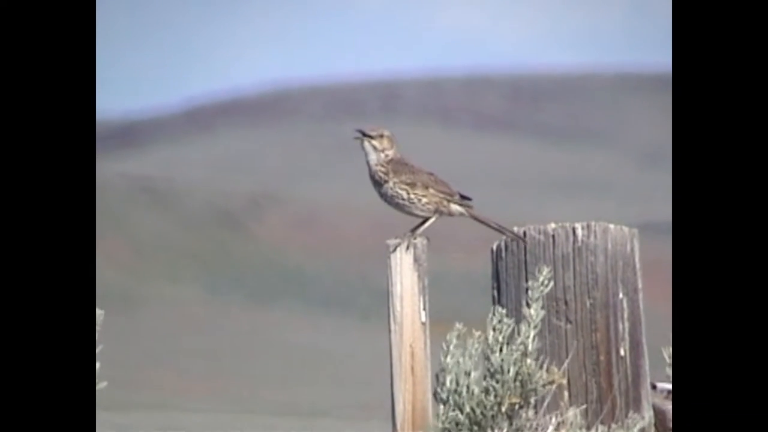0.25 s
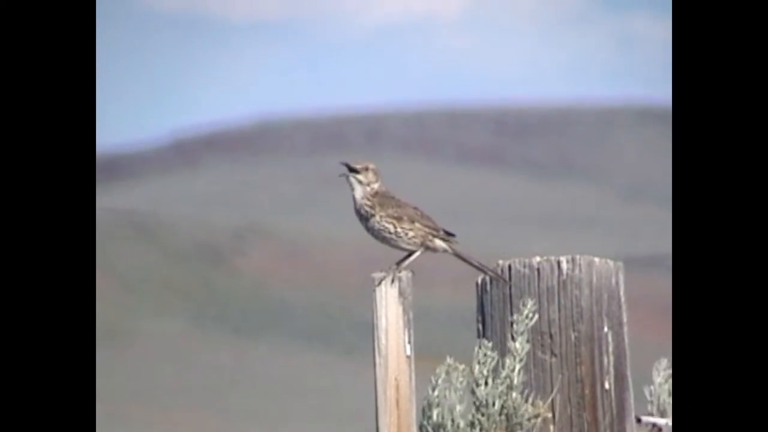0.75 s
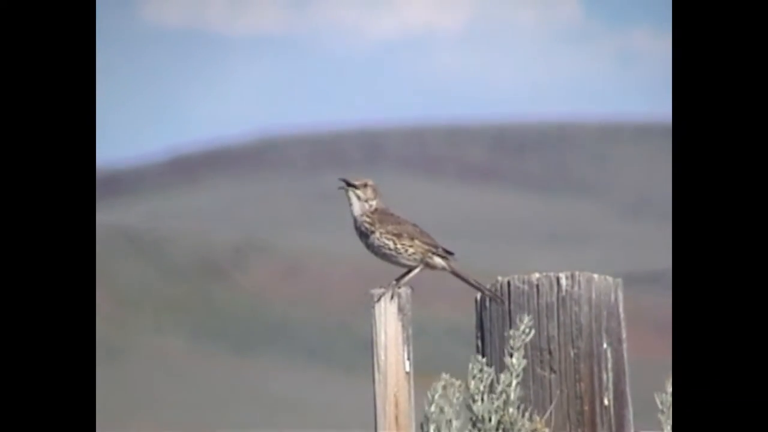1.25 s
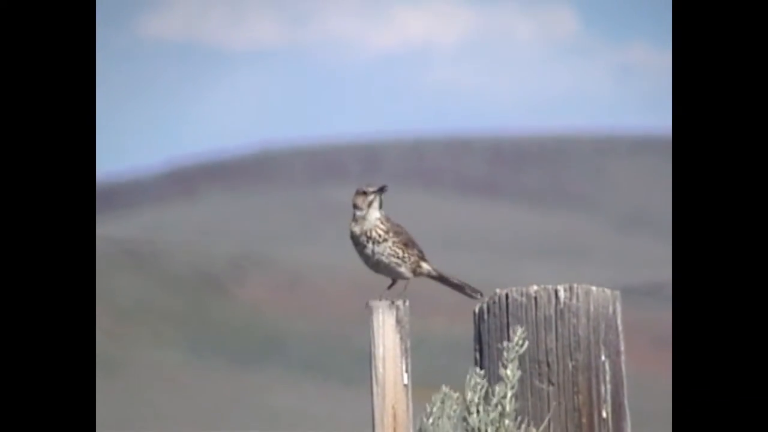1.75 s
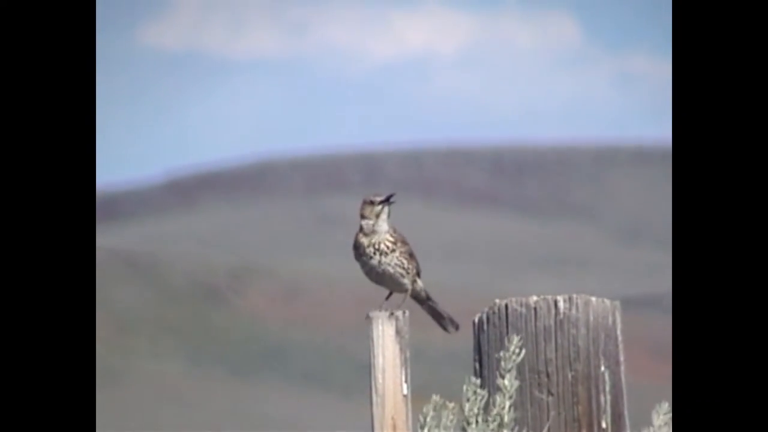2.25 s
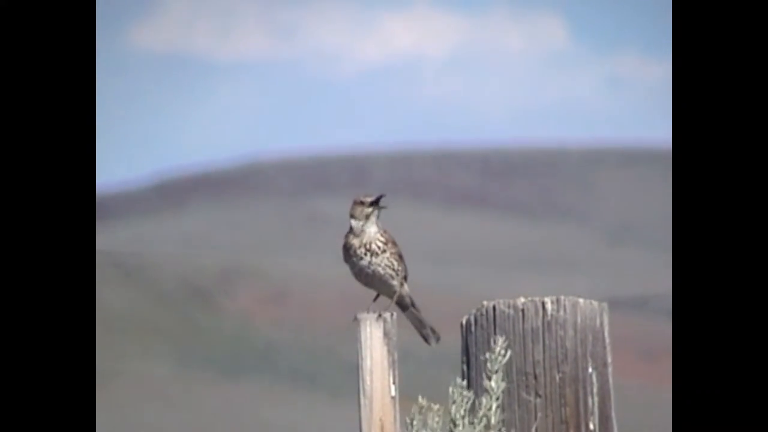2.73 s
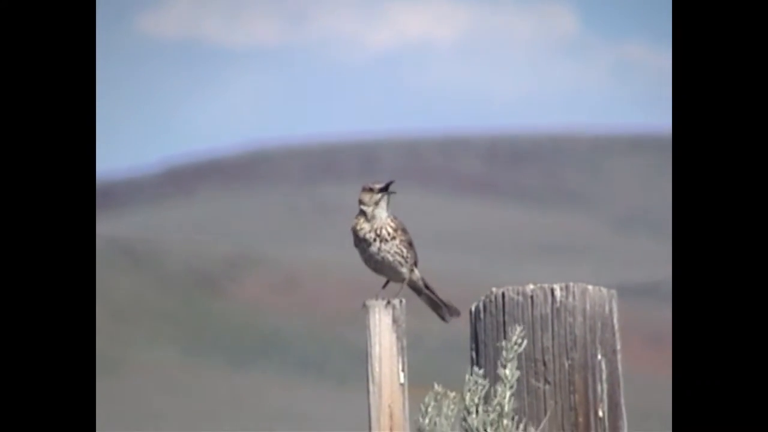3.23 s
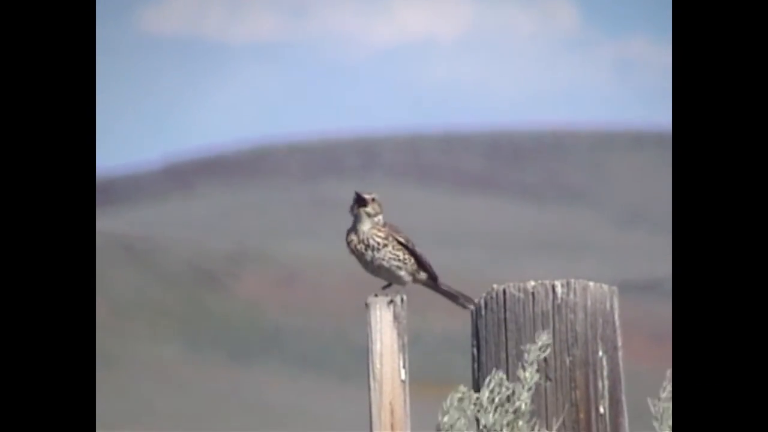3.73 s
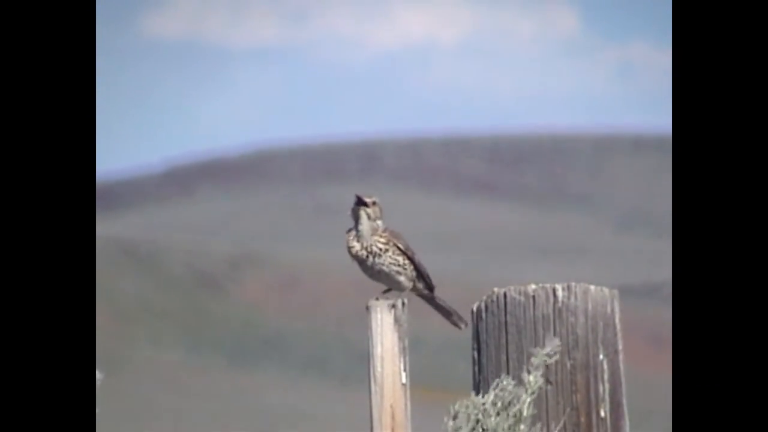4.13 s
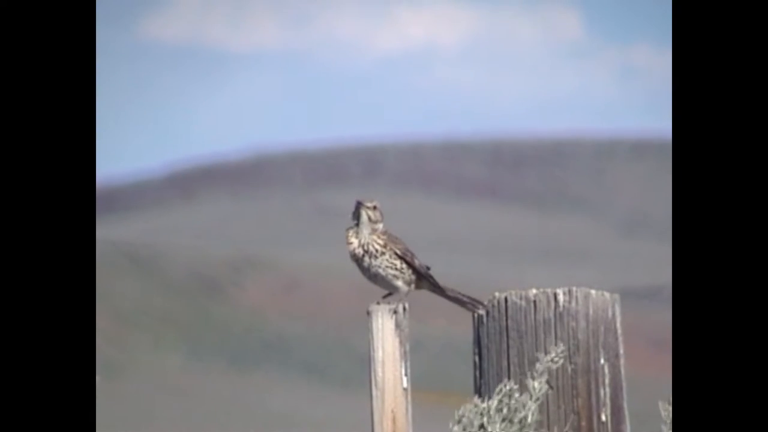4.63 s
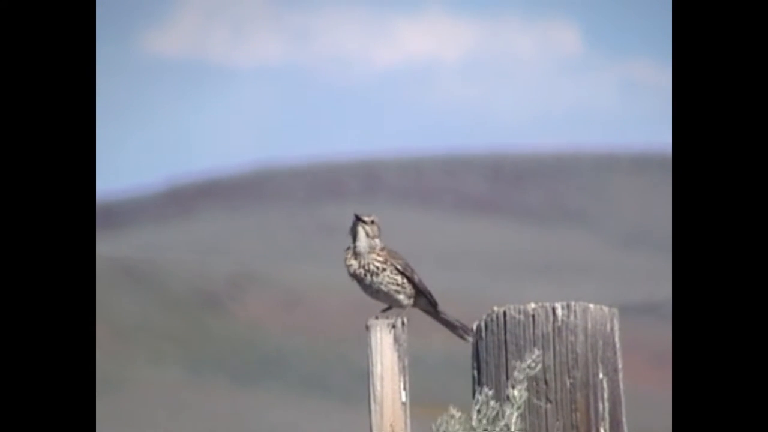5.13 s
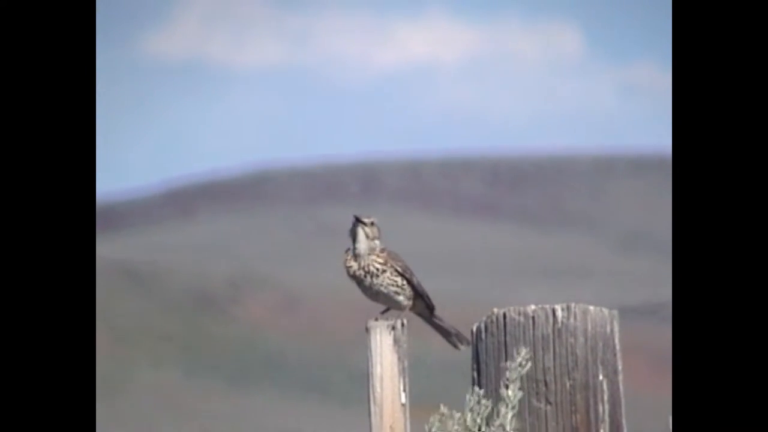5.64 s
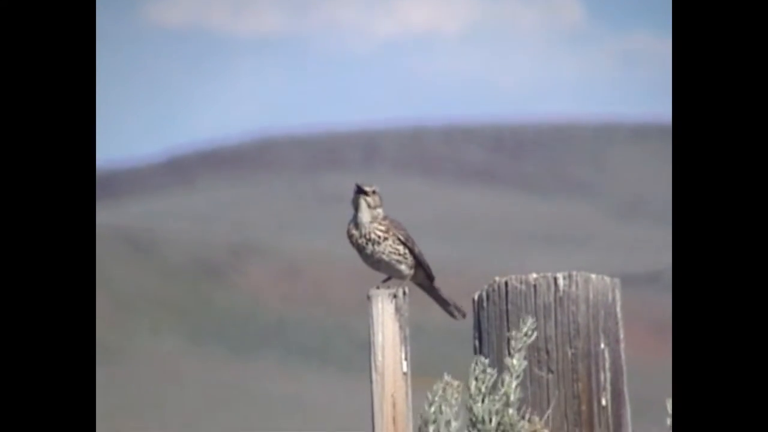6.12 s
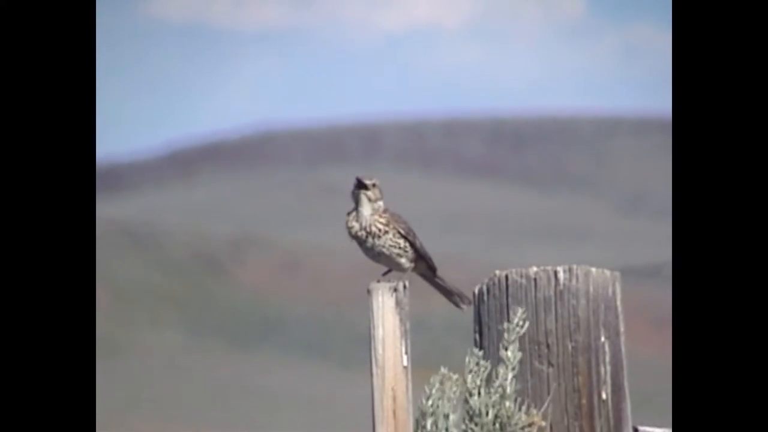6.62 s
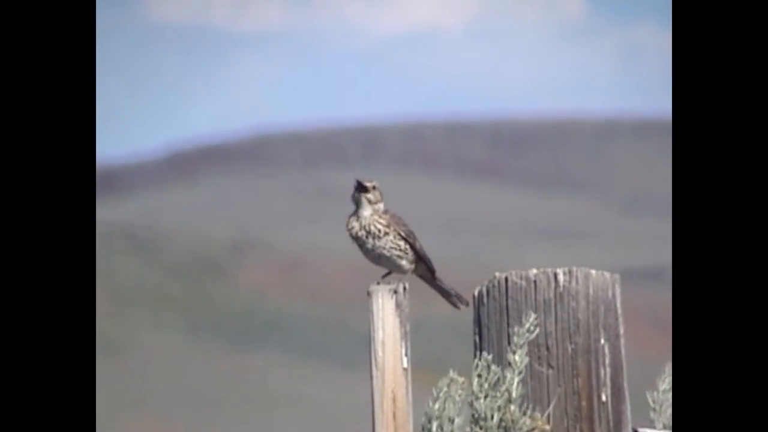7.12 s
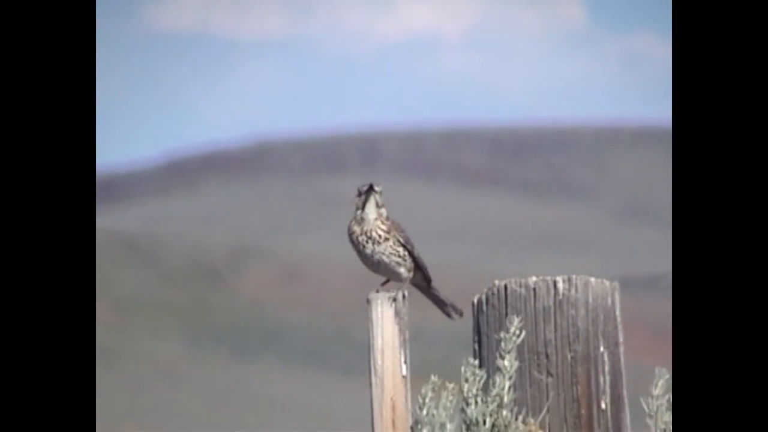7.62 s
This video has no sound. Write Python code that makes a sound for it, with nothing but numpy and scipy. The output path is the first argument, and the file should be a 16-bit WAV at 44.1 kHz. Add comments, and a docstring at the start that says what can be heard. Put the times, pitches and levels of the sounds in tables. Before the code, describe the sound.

A single songbird close by in open scrubland sings almost without pause: faint whistles and buzzes first, then louder sweeps, high shivering trills and reedy rattles, ending in scratches and ticks. Wind puffs lightly on the microphone, thumps hard just before four seconds, then buffets heavily, briefly overloading. One sharp click falls near 4.75 seconds. A faint hiss runs throughout, with barely any echo.

```python
"""A thrush-like songbird on a fence post warbles: whistles and buzzes first, then sweeps, trills and reedy notes.
The two sides of its syrinx sing as gliding tones, and low reeds sweep their overtones through a throat resonance.
The open scrub returns a faint short echo; an even hiss of air and electronics lasts throughout.
Weak gusts of shaped noise open the scene, the first very strong one comes at 3.9 s, a lone click at 4.75 s.
Stronger gusts and breeze follow, the hardest pushed into clipping, and the song ends in scratches and ticks."""
import sys
import numpy as np
from scipy import signal
from scipy.fft import rfft, irfft
from scipy.io import wavfile
from scipy.ndimage import uniform_filter1d

SR = 44100
rng = np.random.default_rng(int(sys.argv[2]) if len(sys.argv) > 2 else 0)


def generate_wav(sig):
    """Save sig (samples, or channels by samples) to the path in sys.argv[1] as 16-bit PCM at SR."""
    pcm = np.round(np.clip(np.atleast_2d(sig).T, -1, 1) * 32767).astype(np.int16)
    wavfile.write(sys.argv[1], SR, pcm)


N = 347067


def undb(db):
    """Level law: 20 dB is a tenfold amplitude."""
    return 10 ** (np.asarray(db) / 20)


def gain_at(hz, points):
    """Frequency response: gain of a (frequency_hz, level_db) curve, interpolated over log frequency."""
    f, db = np.transpose(points)
    return undb(np.interp(np.log(hz + 0.0006), np.log(f), db))


def noise(gain):
    """Spectral shaping: white noise weighted by gain(hz) and brought to rms 1."""
    spectrum = rfft(rng.standard_normal(N)) * gain(np.fft.rfftfreq(N, 1 / SR))
    x = irfft(spectrum, N)
    return x / x.std()


def walk(rate):
    """Slow random modulation: levels held 1 / rate s, smoothed twice, with a standard deviation of 1."""
    hold = max(2, int(SR / rate))
    steps = np.repeat(rng.standard_normal(N // hold + 1), hold)
    x = uniform_filter1d(uniform_filter1d(steps, hold), hold)[:N]
    return x / x.std()


def sung(voice):
    """Motor programme: song notes of one voice, each syllable at its own time, strength, pitch and pace."""
    # Repertoire: syllable name -> gestures of one voice each. "lead" and "second" are the two sides of the
    # syrinx, "reed" is a low note rich in overtones. Warbled gestures add a trill, reeds a throat resonance:
    # voice, start_s, length_s, first_hz, middle_hz, last_hz, level_db (relative),
    # trill_rate_hz, trill_depth_octaves, throat_hz; start, length, pitch and rate before the song's ratios
    syllables = { "whistle": [("lead", 0, .13, 1925, 1883, 1850, 0)],
                 "flick": [("lead", 0, .01, 3550, 3050, 2550, 0)],
                 "tick": [("lead", 0, .004, 2730, 3600, 4400, 0)],
                 "chip": [("second", 0, .004, 3900, 3100, 2200, -10),
                 ("lead", 0, .02, 2300, 2530, 2950, 0)],
                 "buzz": [("lead", .001, .028, 2200, 2330, 2230, 1.5, 155, -0.083),
                 ("lead", .027, .024, 2380, 2480, 2580, -6, 152, -0.154),
                 ("reed", .002, .044, 2200, 2300, 2330, -30, 155, -0.11, 3960)],
                 "twitter": [("lead", 0, .033, 2450, 2155, 2130, 0, 63, -0.1)],
                 "thin trill": [("lead", 0, 0.047, 4680, 4900, 4900, 0, 49, 0.035)],
                 "waver": [("lead", 0, .071, 2640, 2446, 2480, 0),
                 ("lead", .061, .132, 2440, 2303, 2394, -3, 30, 0.036)],
                 "tumble": [("lead", 0, 0.01425, 3600, 3700, 3670, -3.5),
                 ("lead", .016, .019, 4500, 2890, 2890, 0),
                 ("lead", .033, .037, 2530, 3135, 2950, 0, 45, -0.086)],
                 "duet": [("lead", 0, .028, 1880, 2110, 2080, 0),
                 ("second", .015, 0.042, 1720, 1700, 1820, -2.35)],
                 "sigh": [("lead", 0, .028, 1735, 1850, 1960, 0),
                 ("second", 0.026, .016, 1290, 1194, 1230, -6)],
                 "zip": [("reed", 0, 0.0205, 1500, 1964, 2680, 0, 112, 0.16, 3600),
                 ("lead", .016, .034, 2300, 3480, 3930, 0, 121, -0.066)],
                 "settle": [("lead", 0, 0.046, 2620, 2430, 2100, -7, 52, 0.065),
                 ("lead", 0.0341, .032, 2260, 2170, 2200, 0.89), ("lead", .056, .07, 2166, 2158, 2168, 0)],
                 "burr": [("lead", 0, .029, 2300, 2344, 2100, -6, 150, 0.212),
                 ("lead", .028, .015, 1970, 2444, 1894, 0),
                 ("reed", .008, .035, 1700, 2340, 2800, -26, 150, 0.21, 4200),
                 ("reed", 0.036, 0.019, 2700, 1800, 1403, -7.5, 0, 0, 2260)],
                 "hiccup": [("lead", 0, .016, 4530, 3350, 5090, 0),
                 ("lead", 0.011, .044, 4850, 5040, 4750, -7)],
                 "step": [("lead", 0, 0.0341, 2380, 2240, 2124, -9.5, 98.8, 0.1),
                 ("lead", .03, .04, 2210, 2112, 2215, 0), ("lead", .069, .036, 2055, 1956, 1910, -5)],
                 "slur": [("lead", 0, .02, 2700, 2810, 3300, -7.5),
                 ("lead", .026, 0.028, 2510, 2820, 2880, 0), ("lead", .05, 0.085, 2770, 2374, 2040, -1.2)],
                 "two-note": [("lead", 0, .036, 2130, 2313, 1990, 0),
                 ("lead", .048, .02, 2160, 2086, 1780, -1.7)],
                 "swoop": [("lead", 0, .014, 6200, 5130, 4300, -20.5),
                 ("lead", .014, .022, 4300, 3350, 3020, 0), ("lead", .074, .036, 3100, 3440, 3620, 1),
                 ("lead", .1, .066, 3540, 3890, 4060, -2.4)],
                 "whine": [("second", 0, 0.0497, 1905, 1800, 1650, 0.5),
                 ("second", .045, .06, 1620, 1450, 1270, -12.5, 44, .06),
                 ("reed", .018, .1, 1759, 1450, 1220, 0, 44, .08, 2220)],
                 "arch": [("lead", 0, .016, 2900, 3900, 4400, -2.5),
                 ("lead", .013, .021, 4800, 4800, 4050, 0)],
                 "shiver": [("lead", 0, 0.0481, 4020, 3960, 3980, 0, 70.5, 0.0672),
                 ("lead", .043, .034, 3980, 4010, 4080, -5.5, 70.5, 0.055),
                 ("lead", .097, .016, 4620, 4280, 3700, -4.5)],
                 "hook": [("lead", 0, 0.027, 2180, 2520, 2200, -4),
                 ("lead", 0.024, 0.06, 2260, 2240, 2290, 0)],
                 "peak": [("lead", 0, .024, 2700, 2520, 3240, -4),
                 ("lead", .0225, .018, 3460, 2520, 2300, 0)],
                 "long whistle": [("lead", 0, .046, 2480, 2620, 2600, -5),
                 ("lead", .032, .064, 2570, 2530, 2490, 1),
                 ("lead", .086, 0.088, 2500, 2475, 2435, -4, 27, 0.049)],
                 "rattle": [("lead", .002, .021, 2330, 2560, 2950, 0),
                 ("reed", 0.021, .06, 1370, 1340, 1500, -1, 70, 0.336, 2570)],
                 "yodel": [("reed", 0, .023, 1200, 1460, 2600, 0, 0, 0, 2700),
                 ("lead", .022, 0.014, 4000, 2600, 1850, -1.7),
                 ("reed", 0.033, .082, 1990, 1972, 1960, 0, 13.5, -0.043, 2030),
                 ("lead", .108, .008, 2600, 2160, 2800, -1)],
                 "churr": [("lead", 0, 0.037, 2830, 3010, 3090, -5.5, 118, 0.223),
                 ("lead", .026, .042, 3080, 3080, 3050, 0, 100, 0.383)],
                 "slow churr": [("lead", 0, .06, 3500, 2800, 3000, 0, 53, -0.48)],
                 "rise": [("lead", 0, .022, 2630, 3200, 3800, 0),
                 ("lead", 0.031, 0.0079, 4680, 3800, 4800, -2)],
                 "scratch": [("reed", 0, .025, 1700, 1370, 2460, 0, 0, 0, 2740),
                 ("second", .003, 0.0083, 3700, 2900, 1500, -1.03)],
                 "creak": [("reed", 0, .041, 1400, 1716, 2240, 0, 0, 0, 2900),
                 ("reed", .066, 0.019, 2720, 2100, 1600, -2.5, 0, 0, 2950)]}
    # Order of the song: start_s, syllable, level_db (added to the gesture's), pitch_ratio, duration_ratio
    song = [ (0, "whistle", -24, 1.65, 0.1), (0.243, "flick", -28, 1, 0.86),
            (.259, "flick", -25.5, 0.99, 1.1), (.279, "flick", -33.5, 1, 1),
            (.289, "waver", -22.5, 1.002, 0.98), (.568, "whistle", -22.5, 1.001, 0.97),
            (0.776, "tumble", -21.5, 1.003, 1.03), (0.844, "whistle", -16, 1.357, 1.07),
            (1.095, "duet", -24.5, 1.04, 0.99), (1.158, "buzz", -16, 1, 0.93),
            (1.196, "buzz", -24, 1.076, 1), (1.282, "duet", -27, 1.004, 0.88),
            (1.349, "buzz", -17.5, 1.012, 0.93), (1.458, "duet", -27.5, 1.03, 1.03),
            (1.529, "buzz", -23.5, 1.02, 0.9), (1.666, "duet", -38, 0.93, 1.25),
            (1.714, "sigh", -34.5, 1.03, 1.04), (1.909, "zip", -18.5, 1.007, 1.01),
            (2.001, "settle", -14.5, 1.005, 0.98), (2.305, "burr", -12.5, 1.006, 1),
            (2.428, "hiccup", -24, 1, 1.02), (2.55, "thin trill", -31, 1, 1.05),
            (2.667, "step", -11, 1.004, 0.95), (2.82, "slur", -16, 1, 1.01), (3, "two-note", -14, 0.99, 1),
            (3.148, "swoop", -17.5, 1, 0.98), (3.393, "flick", -29, 0.79, 0.44),
            (3.401, "tick", -22.5, 0.66, 1.26), (3.409, "twitter", -17.5, .98, 1.06),
            (3.441, "flick", -31.5, .55, 0.9), (3.516, "whine", -26.5, 1.016, 0.97),
            (3.7, "arch", -18.5, 1, 1), (3.731, "shiver", -8, 1, 1), (3.908, "hook", -14.5, 1.023, 1.03),
            (4.04, "peak", -17, 0.99, 0.99), (4.09, "twitter", -17, 1.014, 0.93),
            (4.172, "long whistle", -17.5, 1.002, 1.04), (4.801, "arch", -20.5, 1.043, 1.15),
            (4.838, "shiver", -15, 1.016, 1.005), (5.022, "hook", -16, .98, 1.02),
            (5.158, "peak", -14.5, 0.99, 0.93), (5.203, "twitter", -16.5, 1.043, 0.95),
            (5.287, "long whistle", -18.5, 0.99, 1.03), (5.541, "rattle", -16, 1, 1),
            (5.654, "yodel", -19, 0.97, .9), (5.844, "churr", -18.5, 1.03, 1.04),
            (5.911, "chip", -18.5, 1.08, .85), (5.92, "tick", -22.5, 1.03, 2.1),
            (5.931, "flick", -26, 0.97, 1), (5.97, "chip", -23.5, 1.03, 0.9),
            (6.027, "chip", -20, .98, 1.17), (6.139, "rattle", -19.5, 1.05, 1),
            (6.266, "yodel", -21, 0.99, 1.09), (6.489, "churr", -21, 1.04, 0.95),
            (6.546, "slow churr", -21.5, 1.07, 0.92), (6.606, "flick", -21, 1.01, .5),
            (6.635, "chip", -27, 1.06, 0.91), (6.69, "chip", -18.5, 1.053, 0.9),
            (6.802, "rattle", -19.5, 1.08, 1.01), (6.943, "yodel", -18.5, 1.01, 1.01),
            (7.175, "rise", -17.5, 1.056, 0.91), (7.207, "thin trill", -30, 0.99, 1.14),
            (7.443, "scratch", -24, 1.05, .85), (7.463, "scratch", -19, 1.08, 0.88),
            (7.489, "scratch", -28, 0.89, 0.93), (7.513, "scratch", -27.5, 0.95, 1.23),
            (7.543, "chip", -33, .98, .9), (7.621, "tick", -23.5, 0.91, .9),
            (7.628, "tick", -22, 1.02, 1.2), (7.722, "creak", -20, 1, 1.01),
            (7.752, "tick", -27, 0.84, 1.9)]
    notes = []
    for start, syllable, level_db, pitch, stretch in song:
        for who, offset, length, first, middle, last, db, *trill in syllables[syllable]:
            if who == voice:
                # a slower syllable also trills more slowly; the throat resonance stays put
                paced = [trill[0] / stretch, *trill[1:]] if trill else []
                notes.append((start + offset * stretch, length * stretch,
                              first * pitch, middle * pitch, last * pitch, level_db + db, *paced))
    return notes


def syrinx(notes, jitter=0.00413, trill_jitter=0.1227, shimmer_db=2.06, throat_offset=0.131,
           second_db=-1, third_db=-4):
    """Self-sustained oscillation: one membrane sings touching notes unbroken; weak overtones pass the beak."""
    # how strongly overtones leave the beak: frequency_hz, level_db (second_db or third_db is added)
    beak = [(3000, -21), (4000, -41.5), (5000, -44), (6800, -39.5), (7800, -28.5), (8600, -26), (9600, -21),
            (11000, -34.5), (12300, -29), (15500, -28)]
    pull, strength, unsteady = np.zeros(N), np.zeros(N), walk(330)
    for start, length, *shape in notes:
        i = span(start, length)
        t = i / SR - start
        glide, swing, size = gesture(t, length, *shape)
        # the throat follows the glide but not the trill, so the note flashes each time it swings through resonance
        size = size * throat(swing + throat_offset) * chop(t, *shape[4:])
        pull[i] += glide * 2 ** (swing * (1 + trill_jitter * unsteady[i])) * size
        strength[i] += size
    # overlapping notes share one pitch, weighted by strength
    hz = pull / (strength + 1e-12) * (1 + jitter * walk(250))
    phase = 2 * np.pi * np.cumsum(hz) / SR
    tone = np.sin(phase)
    for k, db in enumerate((second_db, third_db), 2):
        below_nyquist = k * hz < SR / 2
        tone += undb(db) * gain_at(k * np.abs(hz), beak) * below_nyquist * np.sin(k * phase)
    return tone * strength * undb(shimmer_db * walk(120))


def rasps(notes, throat_width=0.22):
    """Source and filter: low notes sweep overtones through a still throat, which picks out one after another."""
    # overtones at the membrane, in order from the fundamental: multiple, level_db (relative)
    rasp_source = [(1, -1.5), (2, 0.5), (3, -14), (4, -4), (5, -3.5)]
    out, wobble, flutter_db = np.zeros(N), .012 * walk(450), 2 * walk(350)
    for start, length, *shape, throat_hz in notes:
        i = span(start, length)
        glide, swing, size = gesture(i / SR - start, length, *shape)
        hz = np.abs(glide) * 2 ** swing
        # held notes are clean; above 30 octaves per s of sweep the membrane vibrates unsteadily
        speed = np.abs(np.gradient(np.log2(hz))) * SR
        rough = np.clip(speed / 30 - 1, 0, 1)
        hz = hz * (1 + rough * wobble[i])
        size = size * undb(rough * flutter_db[i])
        phase = 2 * np.pi * np.cumsum(hz) / SR
        for k, (_, db) in enumerate(rasp_source, 1):
            resonance = throat(np.log2(k * hz / throat_hz), throat_width)
            out[i] += size * undb(db) * resonance * np.sin(k * phase)
    return out


def gesture(t, length, first, middle, last, db, trill=0, depth=0, edge_s=0.003, swell_db=30, place=0.457, lean=0.41):
    """Frequency modulation: glide (Hz), trill swing (octaves) and one pressure swell; rising notes peak late."""
    u = np.clip(t / length, 0, 1)
    # parabola through the first, middle and last pitch
    glide = first * (1 - u) * (1 - 2 * u) + 4 * middle * u * (1 - u) + last * u * (2 * u - 1)
    swing = depth * np.cos(2 * np.pi * trill * t)
    gate = np.clip(np.minimum(t, length - t) / edge_s + .5, 0, 1)
    peak = place + lean * np.clip(np.log2(last / first), 0, .5)
    return glide, swing, gate * undb(db - swell_db * (u - peak) ** 2)


def span(start, length):
    """Time support: sample indices of a note with 5 ms to spare on each side."""
    begin = max(0, int((start - .005) * SR))
    end = min(N, int((start + length + .005) * SR))
    return np.arange(begin, end)


def throat(octaves, width=0.25):
    """Resonance: gain of the throat at a distance in octaves from its centre."""
    return 1 / (1 + (octaves / width) ** 2)


def chop(t, trill=0, depth=0, onset_rate=122, full_rate=150, most=0.61):
    """Amplitude modulation: the fastest trills throttle the airflow once a cycle."""
    share = np.clip((trill - onset_rate) / (full_rate - onset_rate), 0, 1) * most
    return 1 - share * (1 - np.sin(2 * np.pi * trill * t)) / 2


def scrub(x, near_db=-20, near_t60_s=0.089, far_db=-29, far_t60_s=0.37, delay_s=0.006):
    """Diffuse scattering: posts and ground answer shortly; bushes further off add a thinner, longer echo."""
    t = np.arange(SR // 2) / SR
    response = 0
    for db, t60 in ((near_db, near_t60_s), (far_db, far_t60_s)):
        echoes = rng.standard_normal(len(t)) * np.exp(-np.log(1000) * t / t60) * (t > delay_s)
        response = response + undb(db) * echoes / np.linalg.norm(echoes)
    return x + signal.fftconvolve(x, response)[:N]


def click(decay_s=0.0024):
    """Step with exponential decay: the signal jumps once, heard as a lone sharp click."""
    # the lone sharp click: start_s, level_db
    click_event = (4.7522, -9)
    start, db = click_event
    t = np.arange(N) / SR - start
    return -undb(db) * (t >= 0) * np.exp(-np.abs(t) / decay_s)


def wind(eddy_db=4.5, eddy_rate=40, edge_hz=1300, fall=1.45, split_hz=220, brighten=0.45, full_db=-14,
         steady_s=0.0591):
    """Turbulence: eddies burst on the microphone; faster air sheds smaller ones, so strong gusts are brighter."""
    # colour of the buffeting, held at edge_hz and falling above it: frequency_hz, level_db (relative, per Hz)
    buffet = [(12, -26.5), (20, -16), (65, 2), (118, 0.5), (220, -10), (565, -37), (1400, -59), (1820, -82),
              (3080, -120)]
    gust_db = wind_level()
    rumble = noise(lambda hz: gain_at(np.minimum(hz, edge_hz), buffet) / np.maximum(hz / edge_hz, 1) ** fall)
    eddies = eddy_db * walk(eddy_rate)
    large = signal.sosfiltfilt(signal.butter(2, split_hz, fs=SR, output="sos"), rumble)
    small = (rumble - large) * undb(brighten * (gust_db + eddies - full_db))
    pressure = (large + small) * undb(eddies)
    # the eddies share out the power that the gust brings
    power = uniform_filter1d(pressure ** 2, int(steady_s * SR))
    pressure = pressure / np.sqrt(np.abs(power) + 1e-9) * undb(gust_db)
    # the diaphragm stiffens under the hardest pushes
    return 1.6 * np.tanh(pressure / 1.6)


def wind_level(attack_s=0.0086, release_s=0.013):
    """Power addition: wind level in dB; each gust rises quickly, holds and dies away on top of the breeze."""
    # gusts on the microphone: start_s, length_s, level_db
    gusts = [(0.108, 0.061, -30.5), (.855, .025, -34), (0.304, 0.026, -28.5), (0.967, 0.049, -23),
             (1.072, 0.045, -22), (1.29, 0.12, -32.5), (1.431, .035, -18), (1.468, .03, -24),
             (1.553, 0.037, -28), (1.968, 0.13, -17.5), (2.25, 0.065, -18), (2.453, .09, -23),
             (2.694, 0.26, -21), (2.754, 0.052, -14), (3.021, 0.025, -14.5), (3.058, 0.29, -26),
             (3.173, .06, -17), (3.604, .1, -17), (3.854, 0.044, -18), (3.903, 0.12, -6),
             (4.138, 0.074, -20), (4.512, 0.088, -12.5), (4.646, 0.11, -22.5), (4.81, 0.18, -19),
             (4.893, 0.018, -12), (4.967, 0.029, -16), (5.065, 0.15, -13), (5.117, 0.021, -10.5),
             (5.347, 0.31, -16.5), (5.568, 0.1, -10), (5.776, 0.04, -9), (5.933, 0.06, -7),
             (6.035, 0.17, -14.5), (6.288, 0.047, -5.5), (6.354, 0.052, -8.5), (6.47, .17, -7),
             (6.678, 0.084, -11), (6.857, 0.031, -6.5), (6.907, 0.088, -8.5), (7.242, .24, -16),
             (7.385, .02, -14), (7.489, .035, -10.5), (7.555, 0.076, -20)]
    # breeze between the gusts: time_s, level_db
    breeze = [(0.0, -34.5), (0.83, -43), (1.14, -33.5), (1.82, -38), (3.11, -25.5), (3.44, -39),
              (4.03, -24.5), (4.27, -30.5), (5.74, -16.5), (6.25, -18.5), (6.49, -12), (7.87, -27.5)]
    t = np.arange(N) / SR
    power = undb(np.interp(t, *np.transpose(breeze))) ** 2
    for start, length, db in gusts:
        before = np.maximum(start - t, 0) / attack_s
        after = np.maximum(t - start - length, 0) / release_s
        power = power + (undb(db) * np.exp(-np.minimum(before + after, 20))) ** 2
    return 10 * np.log10(power)


def hiss(level_db=-49.5):
    """Stationary noise: the steady hiss of air and electronics."""
    # colour of the hiss: frequency_hz, level_db (relative, per Hz)
    hiss_colour = [(30, 17.5), (150, 14.5), (400, 22.5), (900, 14.5), (2000, 9), (4000, 5.5), (8000, 2),
                   (16000, 0.5)]
    return undb(level_db) * noise(lambda hz: gain_at(hz, hiss_colour))


def scene():
    """Superposition: the bird with its echo, wind, click and hiss add to one channel."""
    lead = syrinx(sung("lead"))
    second = syrinx(sung("second"), jitter=0.029, shimmer_db=2.5)
    bird = scrub(lead + second + rasps(sung("reed")))
    return (bird + wind() + click() + hiss())[None]


def record(dry, top_hz=15800):
    """Overload and band limit: the hardest gusts clip with a small crackle; the top is cut."""
    clipped = np.clip(dry, -.95, .95)
    # order 10, 0.1 dB ripple, 80 dB rejection
    return signal.sosfilt(signal.ellip(10, .1, 80, top_hz, fs=SR, output="sos"), clipped)


dry = scene()
out = record(dry)
generate_wav(out)
```